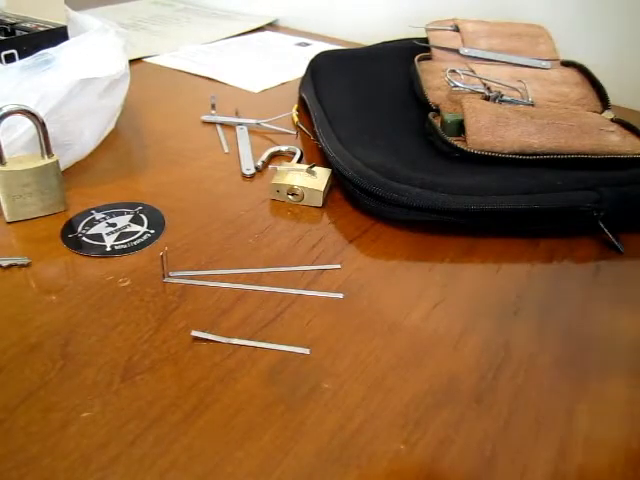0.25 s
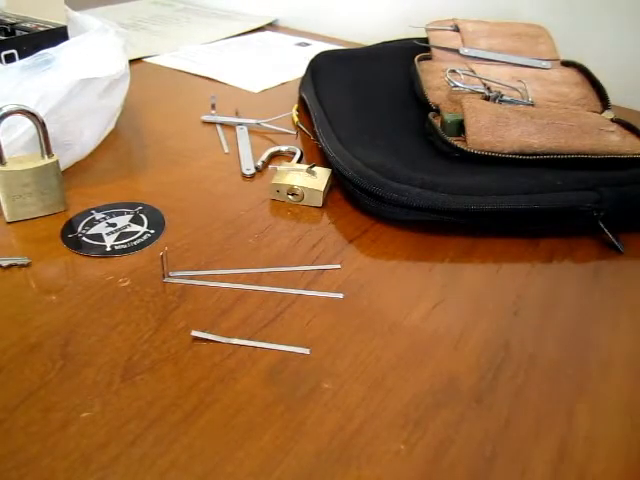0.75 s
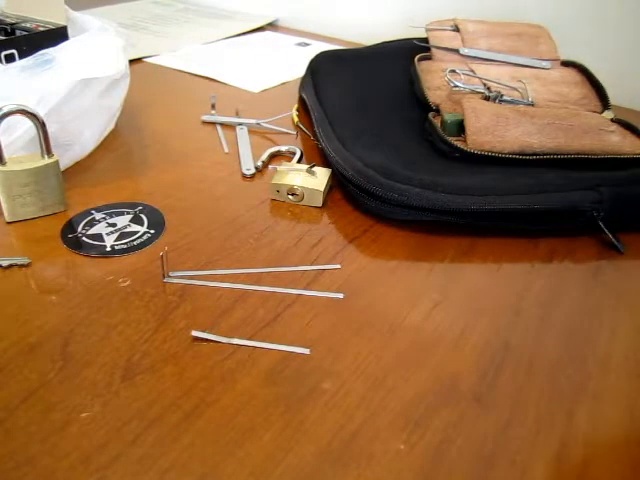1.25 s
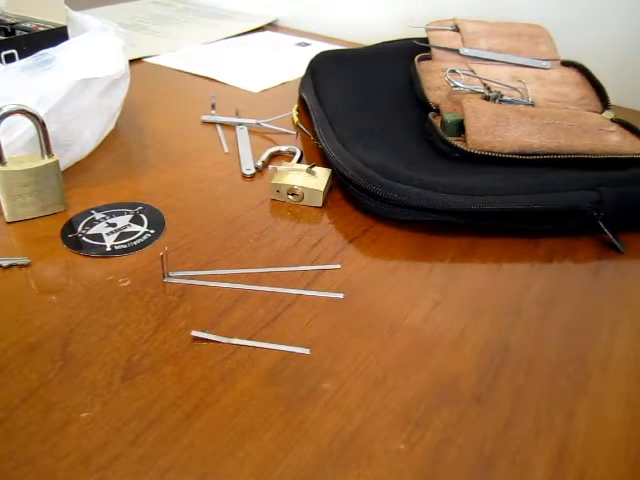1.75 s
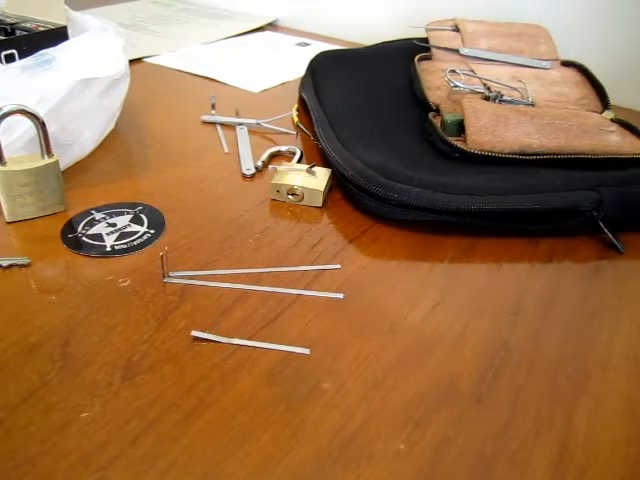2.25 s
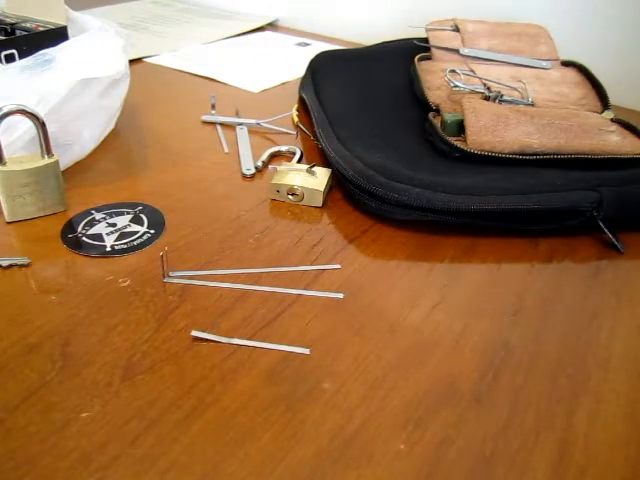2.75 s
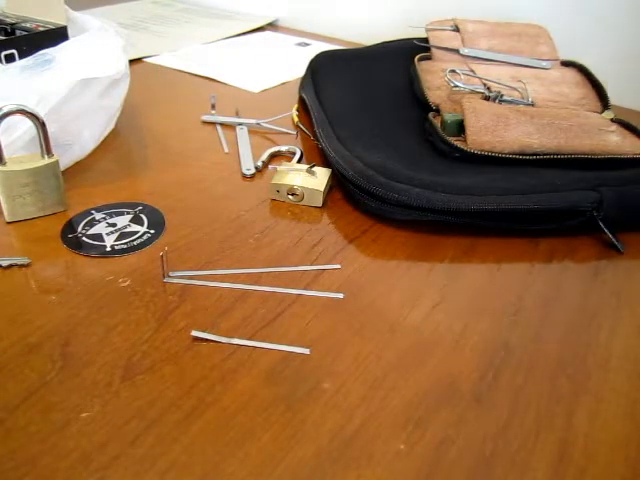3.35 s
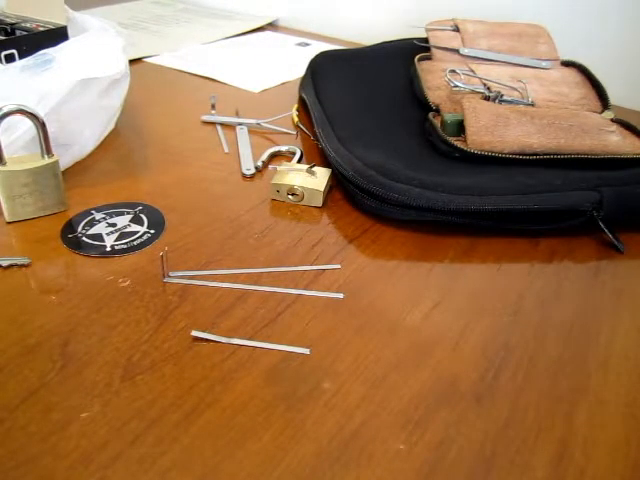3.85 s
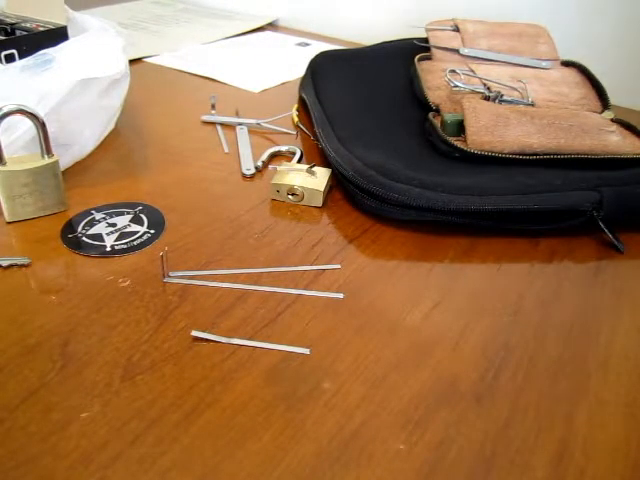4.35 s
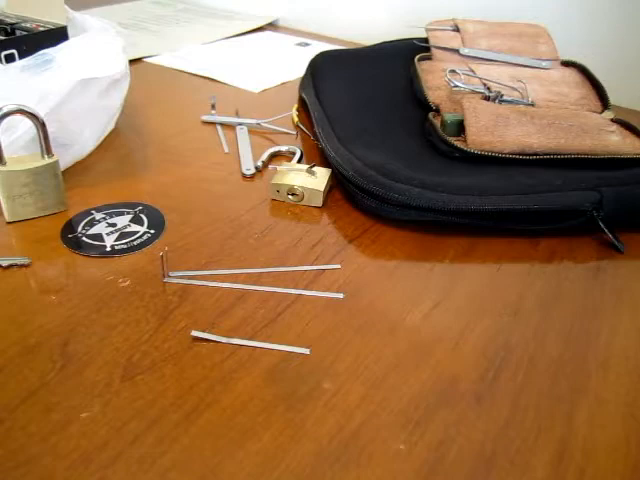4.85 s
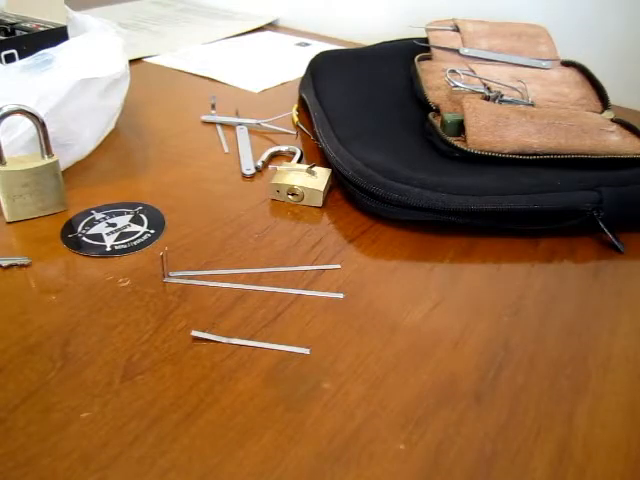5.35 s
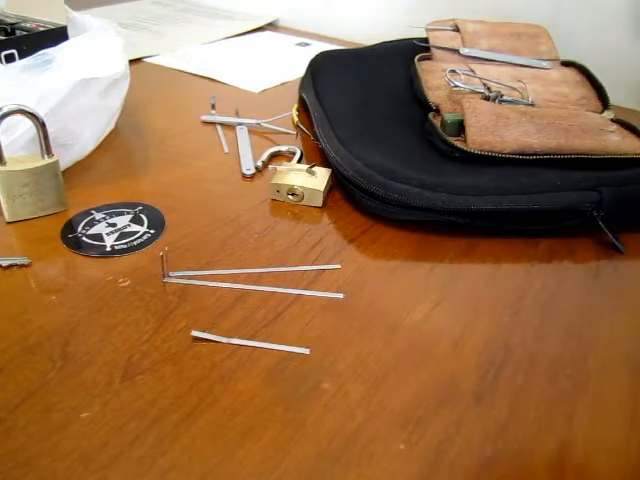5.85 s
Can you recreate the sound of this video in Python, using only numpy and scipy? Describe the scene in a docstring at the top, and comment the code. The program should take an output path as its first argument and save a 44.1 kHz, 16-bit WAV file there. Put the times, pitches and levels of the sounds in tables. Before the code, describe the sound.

Steel handcuffs are handled over a desk in a small room. The chain jingles softly and the cuffs knock together, then short runs of sharp ratchet clicks follow. Light scrapes, ticks and knocks come as fingers work a cuff. The links clink again in a bright cluster, and a hard snap and a fast ratchet zip come near the end. The sound is close, with a short echo and faint low room noise.

```python
"""Chain links jingle softly, then bows knock and links clink: steel handcuffs handled over a desk in a small room.
Links and blows are decaying steel modes with noise at the contact; quick pushes run pawls over ratchet teeth.
Scrapes and the rustle of hands are streams of tiny slips, coloured like steel.
A desk echo and a short diffuse tail surround the cuffs; coloured room noise lies underneath,
and dips briefly at about 0.8 and 5.2 s, after hard snaps."""
import sys
import numpy as np
from scipy import signal
from scipy.fft import rfft, irfft
from scipy.io import wavfile
from scipy.ndimage import uniform_filter1d

SR = 44100
rng = np.random.default_rng(int(sys.argv[2]) if len(sys.argv) > 2 else 0)


def transcribe(u):
    """Save the signal u as a 16-bit wav file named by the first command-line argument.

    u: samples, shape (n,) or (channels, n), limited to [-1, 1]; the rate is SR.
    q: integer samples, one column per channel.
    """
    v = np.clip(np.atleast_2d(u).T, -1, 1)
    q = np.round(v * 32767).astype(np.int16)
    wavfile.write(sys.argv[1], SR, q)


N = 268877
TIME = np.arange(N) / SR

# clear strikes of link on link: t/s, level/dB, brightness/dB (high modes up, lowest mode down)
LINK_STRIKES = [(0.186, -35.5, -0.5), (0.2647, -33, 2.5), (0.522, -37, 3), (0.5985, -40, 2.5),
                (0.659, -33.5, -1.5), (1.366, -40, 2), (1.5013, -35.5, -1.5), (3.6737, -38, 0),
                (3.7052, -33.5, 1.5), (3.7434, -32.5, 4), (3.7769, -33.5, 7.5), (3.8003, -25.5, -1),
                (3.823, -28, -3), (3.9435, -37.5, -1), (3.993, -43, -2), (4.2314, -34, -3.5),
                (4.4487, -29, -2.5), (4.77, -39, 1.5), (4.7851, -29, -1), (4.9634, -47.5, -9),
                (5.0495, -41.5, 3.5), (5.1393, -34.5, 1.5), (5.189, -31.5, -3.5), (5.376, -47, -4.5),
                (5.477, -32, -2.5), (5.744, -34.5, -2), (5.8737, -35.5, -4.5), (6.048, -43.5, 5.5),
                (6.0913, -28.5, -5.5)]
# modes of a chain link: f/Hz, level/dB within its group
LINK_MODES = [(3059, 1.5), (4476, 2.5), (5445, -1), (6461, -12), (7433, -3), (7474, -29.5), (7875, -16),
              (8488, -6.5), (9098, -6), (9372, -14.5), (11395, -13.5), (11930, -10.5), (12290, -18.5),
              (14130, -13.5), (14725, -20)]
# lowest, middle and high modes in an ordinary strike: level/dB each
STRIKE_GROUP_DB = [2.5, -2.5, 0]
# spells of links shifting against each other: t/s, length/s, level/dB
JINGLE_SPELLS = [(0, 0.14, -40), (0.283, 0.44, -34.5), (1.018, 0.1, -37.5), (1.327, 0.21, -37.5),
                 (3.65, 0.44, -40.5), (4.314, .24, -37.5), (4.78, 0.29, -40.5), (5.643, 0.52, -44.5)]
JINGLE_SWELL_DB = 1  # the middle of a spell is this much fuller than its ends

# pushes of a bow through its lock: first tooth t/s, last tooth t/s, teeth/count, each gap over the one
# before/ratio, level/dB before trim, extra on the first tooth level/dB, mid-push brightening/dB per octave,
# second pawl level/dB relative to the first
BOW_PUSHES = [(0.7562, 0.851, 5, .96, -23, 11, 6.5, -1), (0.8794, 0.898, 2, 1.2, -20.5, -2, 0, -16),
              (1.7505, 1.793, 3, .8, -16.5, 1, 0.5, -31), (1.8241, 1.8932, 3, .75, -17.5, -0.5, 1, -12),
              (5.1503, 5.151, 2, 1, -12, -1, 0, -20), (5.4276, 5.4982, 13, 1.055, -18, 0.5, 3, -20)]
SECOND_PAWL_S = 0.0072  # lag behind the first pawl
SETTLE_TEETH = 2.5  # the first tooth's extra level shrinks e-fold over this many teeth
PAWL_TILT_DB = 0  # brightness per octave at the ends of a push

# bow, cheeks and lock knocking together: t/s, level/dB, brightness/dB per octave before knocks() adds its own
CUFF_KNOCKS = [(0.1266, -26.5, -2.5), (0.2756, -17.5, 7), (0.2985, -20, 3), (0.4734, -14.5, 4),
               (0.5986, -21, -2.5), (2.048, -22, -5), (2.1111, -33.5, -2), (2.312, -28, -7),
               (2.387, -24, 1.5), (2.6535, -37, -6), (2.7309, -36, -19), (2.976, -29, -1),
               (3.0064, -30.5, -6), (3.0391, -27, -3), (3.1032, -31.5, -5.5), (4.4476, -17, -2.5),
               (5.553, -23, -2.5)]
# resonances of a cuff, damped by the hand: f/Hz, level/dB
CUFF_MODES = [(2950, 1), (3700, 2.5), (4180, -3.5), (5060, -2), (6700, -4), (6950, -34), (8050, 0),
              (9300, -7.5), (11300, -2.5)]
# spectrum of steel cracking on steel: f/Hz, level/dB
CRACK_COLOUR = [(300, -40), (1000, -12.5), (2200, -6.5), (3000, 4), (5400, 6.5), (7000, 3), (11300, -1.5),
                (13500, -11), (16000, -15.5)]
THUD_GROWTH = 0.55  # dB of thud for each dB of blow
LEAD_S, LEAD_DB = 0.0035, -18  # a faint click leads each knock by this long, and this much softer

THIN_HZ = 10944  # a thin high mode that several blows wake
# blows that wake mainly one mode of a cuff or link: t/s, f/Hz, level/dB, t60/s
SINGING_MODES = [(0.273, THIN_HZ, -28.5, 0.42), (0.472, THIN_HZ, -32, 0.68), (.473, 7860, -29.5, 0.24),
                 (.473, 567, -36.5, 0.064), (3.028, 2996, -35.5, 0.15), (3.44, THIN_HZ, -44, 0.44),
                 (3.674, 1148, -39.5, 0.29), (3.7566, 5445, -12.5, 0.046), (3.789, 1132, -35, 0.16),
                 (4.2316, 3084, -18.5, 0.079), (5.429, 2450, -17, 0.06)]

# steel sliding on steel, or duller under the fingers: t/s, length/s, level/dB, brightness/dB per octave
SCRAPE_STROKES = [(1.246, 0.056, -41.5, 1.5), (1.928, 0.12, -39, 1), (2.024, 0.061, -32.5, 2),
                  (2.242, 0.077, -36, 3), (2.424, .12, -39.5, -4.5), (2.593, 0.094, -37.5, -1),
                  (2.999, 0.15, -44.5, -1), (3.368, 0.12, -42.5, 0.5), (3.455, 0.07, -38, -11.5)]
# spectrum of rubbing steel before its tilt: f/Hz, level/dB
RUBBED_STEEL = [(250, -11), (700, -9.5), (1050, -6), (1400, -8), (1800, -6), (3000, 1.5), (7000, 2.5),
                (11500, -4.5), (15000, -14)]
BOW_WORKED_S = (1.9, 3)  # the fingers work the bow from, to

# loudness of the room noise over time: t/s, level/dB
NOISE_LEVEL = [(0, -52.5), (.74, -51), (.8, -68), (1.3, -53.5), (2.0, -55.5), (3.6, -46.5), (5.12, -45),
               (5.2, -56), (6.1, -51.5)]
# spectrum of the room noise: f/Hz, level/dB
NOISE_COLOUR = [(20, -5.5), (42, 2.5), (80, -8), (250, -10.5), (600, -17.5), (1500, -23), (4000, -36),
                (15000, -38)]
ROOM_T60_S, ROOM_TREBLE_T60_S, ROOM_DB = 0.54, 0.43, -7
DESK_ECHO_S, DESK_ECHO_DB = 0.0084, -15
TOP_HZ = 15800


def undb(db):
    """Turn dB into an amplitude factor."""
    return 10 ** (np.asarray(db) / 20)


def unit(x):
    """Scale to rms 1."""
    return x / np.sqrt(np.mean(x ** 2))


def curve(rows):
    """Gain along (s, dB) rows."""
    return undb(np.interp(TIME, *np.transpose(rows)))


def fade(t, t60):
    """Free decay, 60 dB in t60."""
    return np.exp(-np.log(1000) * t / t60)


def add(track, s, sound):
    """Mix a sound in at time s."""
    i = max(int(s * SR), 0)
    track[i:i + len(sound)] += sound[:max(N - i, 0)]


def colour(x, points):
    """Causal filter through (Hz, dB) points, built from the cepstrum."""
    hz, db = np.transpose(points)
    size = 4096
    bin_hz = np.arange(size // 2 + 1) * SR / size
    gain_db = np.interp(np.log(bin_hz + 1), np.log(hz), db)
    cepstrum = irfft(np.log(undb(gain_db)))
    # fold the cepstrum forward in time: minimum phase, so nothing sounds before the blow
    cepstrum[1:size // 2] *= 2
    cepstrum[size // 2:] = 0
    response = irfft(np.exp(rfft(cepstrum)))
    return signal.fftconvolve(x, response)[:len(x)]


def tilt(x, db_per_octave):
    """Brighten or dull a sound between 1.5 and 12 kHz."""
    octaves = 3
    return colour(x, [(1500, 0), (12000, octaves * np.clip(db_per_octave, -14, 7))])


def link_ring(t, group_db, hold, t60_s=0.24, shorter=0.17, uneven_db=3.0, detune=0.0019,
              touch_s=0.012, flutter_db=5.5, slip=0.62):
    """One link rings; each new touch of its neighbour hands energy round the modes and nudges their phase.

    hold scales t60_s, the decay of the lowest mode; touch_s is the mean time between touches.
    """
    hz, db = np.transpose(LINK_MODES)
    group = np.digitize(hz, [4000, 6000])
    weight, shift, phase = rng.standard_normal((3, len(hz), 1))
    swing, nudge = rng.standard_normal((2, len(hz), 64))
    touch = np.searchsorted(np.cumsum(touch_s * rng.exponential(size=63)), t)

    unrest = np.sqrt(hz / hz.mean())[:, None]  # short waves feel the contact most
    mode_db = (db + np.asarray(group_db)[group])[:, None]
    gain = undb(mode_db + unrest * (uneven_db * weight + flutter_db * swing))
    phase_walk = np.exp(1j * slip * unrest * np.cumsum(nudge, axis=1))
    state = (gain * phase_walk)[:, touch]

    t60 = hold * t60_s * (hz[0] / hz[:, None]) ** shorter  # higher modes die sooner
    turn = np.exp(2j * np.pi * hz[:, None] * (1 + detune * shift) / SR)
    pole = turn * fade(1 / SR, t60)
    ring = np.exp(2j * np.pi * phase) * np.cumprod(np.broadcast_to(pole, state.shape), axis=1)
    smooth_state = uniform_filter1d(state, size=48)  # about 1 ms, so touches do not click
    return np.sqrt(2) * np.sum((smooth_state * ring).imag, axis=0)


def clinks(ring_db=0, hold=0.92, tick_db=-2, tick_t60_s=0.054, buzz_db=-8, buzz_t60_s=0.37):
    """Each clink: a tick at the contact, the ring, and a fine buzz while the links still touch."""
    out, t = np.zeros(N), TIME[:SR // 4]
    touch = undb(tick_db) * fade(t, tick_t60_s) + undb(buzz_db) * fade(t, buzz_t60_s)
    for s, db, bright_db in LINK_STRIKES:
        group_db = STRIKE_GROUP_DB + bright_db * np.array([-1, 0, 1])
        ring = link_ring(t, group_db, hold)
        noise = unit(colour(rng.standard_normal(len(t)), RUBBED_STEEL))
        contact = noise * touch * undb(bright_db / 2)
        add(out, s, undb(db) * (undb(ring_db) * ring + contact))
    return out


def jingle(per_s=70, ring_db=-8, low_db=-2, middle_db=-4, hold=0.29, spread_db=2,
           tick_db=-4, tick_t60_s=0.07):
    """Links in a spell keep nudging each other: short rings with uneven modes, each with a noise tick."""
    out, t = np.zeros(N), TIME[:SR // 14]
    hiss = unit(colour(rng.standard_normal(N), RUBBED_STEEL))
    for start, length, db in JINGLE_SPELLS:
        count = int(per_s * length) + 1
        times = start + length * (np.arange(count) + rng.random(count)) / count
        for s in times:
            ring = link_ring(t, [low_db, middle_db, 0], hold, uneven_db=5, detune=0.007)
            tick = hiss[rng.integers(N - len(t)):][:len(t)] * fade(t, tick_t60_s)
            # 2/pi is the mean of the arch, so the swell leaves the average dB level alone
            swell_db = JINGLE_SWELL_DB * (np.sin(np.pi * (s - start) / length) - 2 / np.pi)
            level_db = db + swell_db + spread_db * rng.standard_normal()
            add(out, s, undb(level_db) * (undb(ring_db) * ring + undb(tick_db) * tick))
    return out


def click(db, tilt_db, body_t60_s, crack_t60_s, crack_db, uneven_db=10.5):
    """A blow on a hand-held cuff: a noise crack and briefly ringing modes, tilted in dB per octave."""
    t = TIME[:SR // 10]
    hz, mode_db = np.transpose(CUFF_MODES)
    weight, shift = rng.standard_normal((2, len(hz)))
    modes = np.sin(2 * np.pi * np.outer(hz * (1 + 0.015 * shift), t))
    strengths = np.sign(shift) * undb(mode_db + uneven_db * weight)
    body = strengths @ modes * fade(t, body_t60_s)
    crack = colour(rng.standard_normal(len(t)) * fade(t, crack_t60_s), CRACK_COLOUR)
    octaves = 2
    slope = [(3000, 0), (12000, octaves * np.clip(tilt_db, -12, 8))]
    sound = colour(unit(body) + undb(crack_db) * unit(crack), slope)
    return undb(db) * sound / np.std(sound[:SR // 250])  # level set over the first 4 ms


def ratchet(level_db=-0.5, second_tilt_db=1, snap_t60_s=0.012):
    """Two pawls snap behind each tooth; the tilt swells in mid-push, and a fast pawl skids and smears."""
    out = np.zeros(N)
    skid_gap_s = 0.006
    for start, end, teeth, slowing, db, first_db, swell_db, second_db in BOW_PUSHES:
        tooth = np.arange(round(teeth))
        gaps = slowing ** tooth * (end - start) / np.sum(slowing ** tooth[:-1])
        times = start + np.cumsum(gaps) - gaps
        levels = level_db + db + first_db * np.exp(-tooth / SETTLE_TEETH)
        tilts = PAWL_TILT_DB + swell_db * np.sin(np.pi * tooth / tooth[-1])
        pawls = [(0, 0, 0), (SECOND_PAWL_S, second_db, second_tilt_db)]
        for s, gap, snap_db, tilt_db in zip(times, gaps, levels, tilts):
            smear = 1 + min(skid_gap_s / gap, np.sqrt(2)) ** 2  # stretches the crack, at most threefold
            for lag_s, pawl_db, pawl_tilt_db in pawls:
                snap = click(snap_db + pawl_db, tilt_db + pawl_tilt_db, body_t60_s=0.018,
                             crack_t60_s=snap_t60_s * smear, crack_db=8.5)
                add(out, s + lag_s, snap)
    return out


def knocks(level_db=0, bright_db=1, thud_db=-26, thud_t60_s=0.054):
    """A faint click leads each blow, which shakes the cuff: its dull thud grows more slowly than the crack."""
    out, t = np.zeros(N), TIME[:SR // 10]
    thud_colour = [(200, -28), (600, -3.0), (1400, 3.5), (3000, -16)]
    for s, db, tilt_db in CUFF_KNOCKS:
        thud = unit(colour(rng.standard_normal(len(t)), thud_colour))
        for lead_s, contact_db in [(LEAD_S, LEAD_DB), (0, 0)]:
            blow = click(db + level_db + contact_db, tilt_db + bright_db,
                         body_t60_s=0.03, crack_t60_s=0.019, crack_db=8.5)
            add(out, s - lead_s, blow)
        add(out, s, undb(thud_db + THUD_GROWTH * db) * thud * fade(t, thud_t60_s))
    return out


def singing():
    """Single modes that a blow wakes, some cut short and some ringing on, each a decaying sine."""
    out, t = np.zeros(N), TIME[:SR]
    for s, hz, db, t60 in SINGING_MODES:
        tone = np.sqrt(2) * np.sin(2 * np.pi * hz * t)
        add(out, s, undb(db) * tone * fade(t, t60))
    return out


def grains(per_s, spread_db):
    """Tiny contacts at random moments, of uneven size."""
    size = undb(spread_db * np.minimum(rng.exponential(size=N), np.pi))
    return (rng.random(N) < per_s / SR) * size * rng.choice([-1, 1], N)


def friction(rub_db=-57, rub_tilt_db=-5, catch_db=-3, catch_t60_s=0.045):
    """A scrape is a stream of tiny slips; some catch and ring at a pitch set by the point of contact."""
    out, t = np.zeros(N), TIME[:SR // 25]
    catches_per_s = 700
    slips = unit(colour(grains(2500, 4.7), RUBBED_STEEL))
    for s, length, db, tilt_db in SCRAPE_STROKES:
        size = int(length * SR)
        catches = np.zeros(N)
        for place, pitch, force in rng.random((int(catches_per_s * length) + 1, 3)):
            hz = 700 * 18 ** pitch  # 700 Hz to 12.6 kHz
            ring = np.sin(2 * np.pi * hz * t) * fade(t, catch_t60_s)
            add(catches, place * length, force ** 2 * ring)
        caught = unit(colour(catches[:size], RUBBED_STEEL))
        stream = unit(slips[int(s * SR):][:size]) + undb(catch_db) * caught
        stroke = unit(tilt(stream, tilt_db)) * signal.windows.tukey(size, 0.4)
        add(out, s, undb(db) * stroke)
    # the fingers never rest
    rustle = undb(rub_db) * unit(tilt(slips, rub_tilt_db))
    return out + rustle


def loose_parts(per_s=22, ticks_db=-45, spread_db=3, tilt_db=-2):
    """While the fingers work the bow, loose parts tick under them, each with its own colour."""
    out = np.zeros(N)
    start, end = BOW_WORKED_S
    count = int(per_s * (end - start))
    for place, force in rng.random((count, 2)):
        level_db = ticks_db + spread_db * (2 * force - 1)
        tick = click(level_db, tilt_db, body_t60_s=0.02, crack_t60_s=0.013, crack_db=3)
        add(out, start + place * (end - start), tick)
    return out


def room(x, first_s=0.0037):
    """A near reflection off the desk and a diffuse noise tail whose treble dies sooner."""
    t = TIME[:int(0.8 * SR)]
    low_pass = signal.butter(2, 7000, fs=SR, output="sos")
    high_pass = signal.butter(2, 7000, "high", fs=SR, output="sos")
    low = signal.sosfilt(low_pass, rng.standard_normal(len(t)))
    high = signal.sosfilt(high_pass, rng.standard_normal(len(t)))
    tail = low * fade(t, ROOM_T60_S) + undb(1.5) * high * fade(t, ROOM_TREBLE_T60_S)
    tail = tail * (t > first_s)
    response = undb(ROOM_DB) * tail / np.linalg.norm(tail)
    response[int(DESK_ECHO_S * SR)] += undb(DESK_ECHO_DB)
    return x + signal.fftconvolve(x, response)[:N]


def room_noise():
    """Steady random noise, strongest in the bass, riding a level curve with brief dips."""
    return curve(NOISE_LEVEL) * unit(colour(rng.standard_normal(N), NOISE_COLOUR))


def scene():
    """The cuffs sound in the room, over the room noise, in one channel."""
    links = clinks() + jingle()
    blows = ratchet() + knocks() + singing()
    handling = friction() + loose_parts()
    return (room(links + blows + handling) + room_noise())[None]


def record(dry):
    """Peaks beyond full scale are clipped flat, then a steep low-pass cuts the top."""
    top_cut = signal.ellip(10, 0.2, 70, TOP_HZ, fs=SR, output="sos")
    return signal.sosfilt(top_cut, np.clip(dry, -1, 1))


dry = scene()
out = record(dry)
transcribe(out)
```